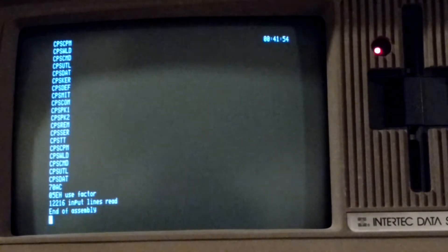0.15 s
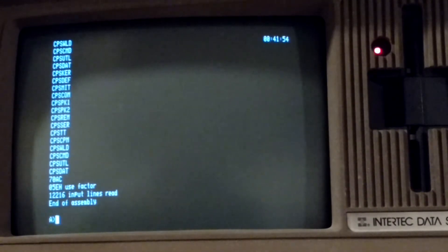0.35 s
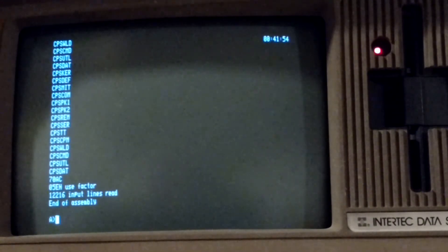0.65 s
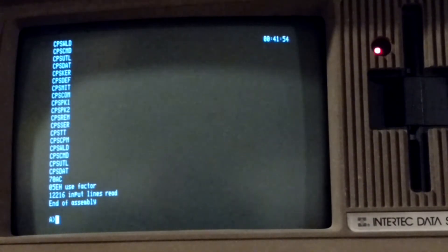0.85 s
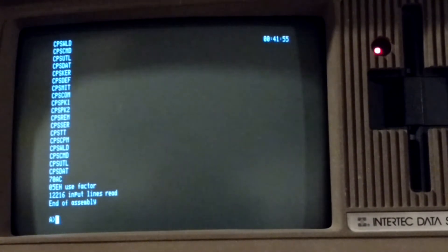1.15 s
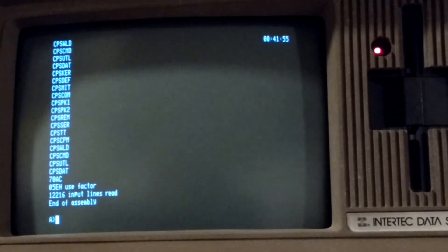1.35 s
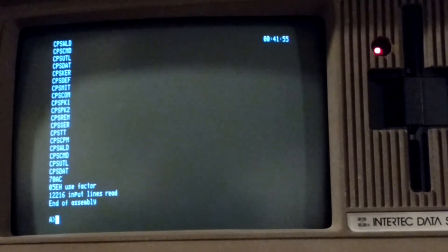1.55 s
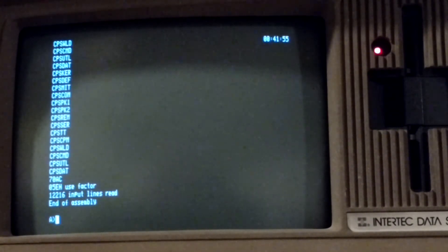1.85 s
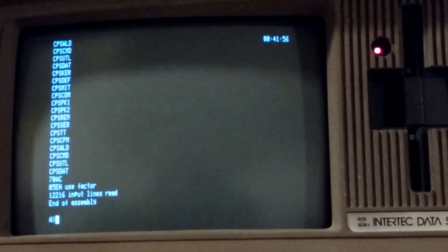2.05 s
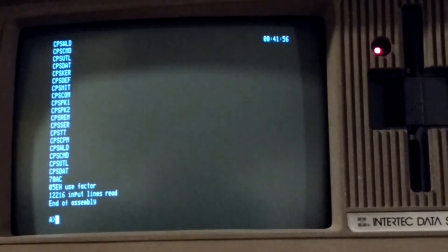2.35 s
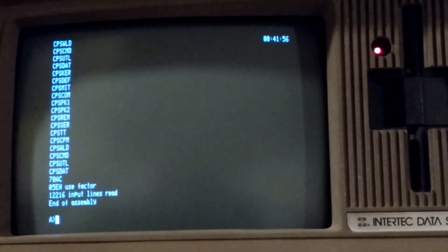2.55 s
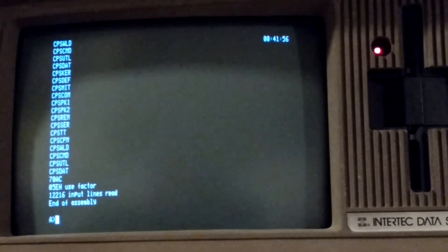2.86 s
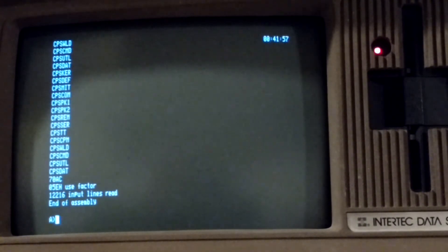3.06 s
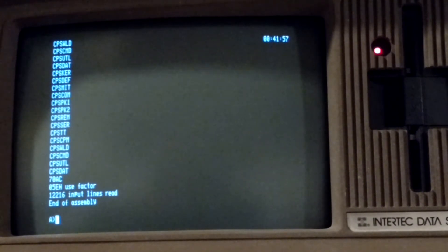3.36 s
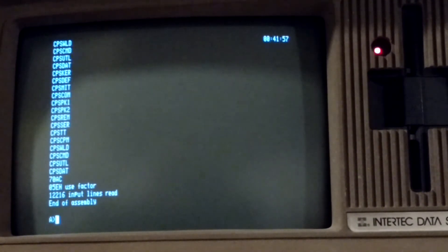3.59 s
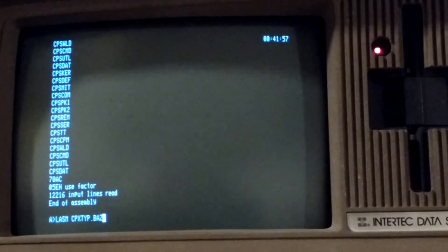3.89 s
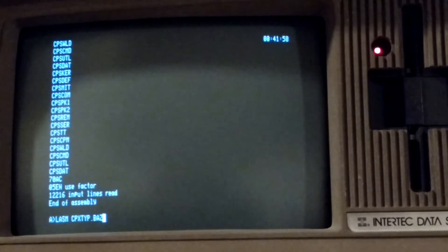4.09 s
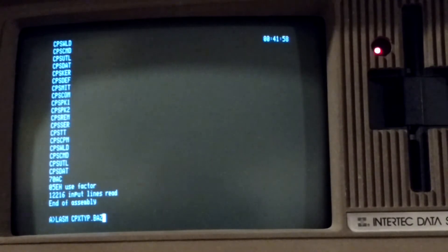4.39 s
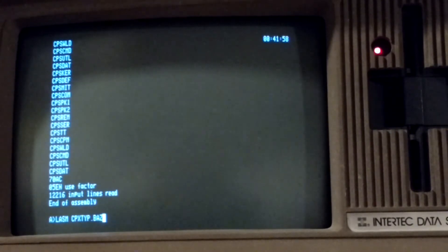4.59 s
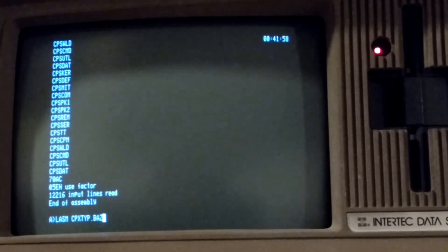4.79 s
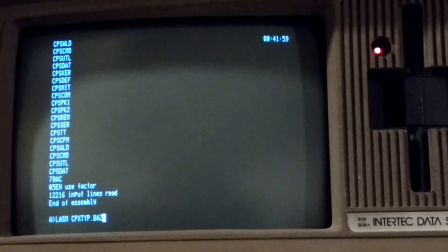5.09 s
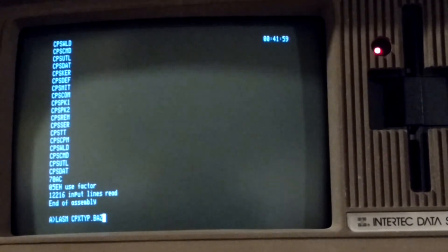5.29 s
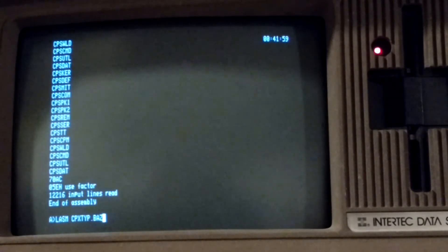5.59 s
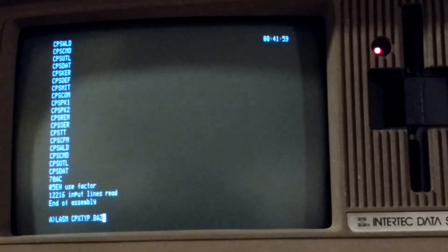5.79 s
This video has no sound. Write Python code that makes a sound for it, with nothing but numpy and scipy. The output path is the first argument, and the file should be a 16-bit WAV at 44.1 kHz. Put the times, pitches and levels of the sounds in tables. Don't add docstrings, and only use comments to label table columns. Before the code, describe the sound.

A small room, close stereo microphone. An old computer's fan hums low and steadily with soft airy hiss, and a thin whine near 15 kHz stays constant. At the start the disk rubs faintly in its sleeve, fading within about half a second. Dull thuds with bright ticks come in pairs at 0.2 and 0.45 s. At 0.88 s the head starts a long run of steps, about 33 per second, a rattling ratchet pulsing slightly every four steps and softening until 1.8 s. After a brief gap, a slightly softer return run goes from 2.0 to 2.9 s, ending in uneven, sharper clicks and a tiny metallic ping at 3.1 s. Fan alone follows. Short double clicks come at 3.73 and 4.0 s, four quick ones at 4.55 s, a firmer thud with a close double tick at 5.13 s, and a last dull click at 5.93 s.

```python
import sys
import numpy as np
from scipy import signal
from scipy.fft import rfft, irfft, next_fast_len
from scipy.io import wavfile
from scipy.ndimage import uniform_filter1d, map_coordinates

SR = 44100
rng = np.random.default_rng(int(sys.argv[2]) if len(sys.argv) > 2 else 0)


def dump(signal):
    limited = np.clip(np.atleast_2d(signal).T, -1, 1)
    pcm = np.round(limited * 32767).astype(np.int16)
    wavfile.write(sys.argv[1], SR, pcm)


def nominal_scale(level):
    x = np.asarray(level, float) / 20
    return 10 ** x


N = 261925

# frequency in Hz, t60 in seconds.
ROOM_DECAY = [(150, 0.56), (1000, 0.36), (4000, 0.27), (12000, 0.2)]

# pitch in Hz; below, its level in dB.
TUBE_HZ = [15434, 15253, 15072]
TUBE_DB = [0, -10, -21]

# pitch in Hz; below, its level over the cabinet noise in dB.
FAN_HZ = [179.7, 442.3, 473.9, 505.4, 638.5, 670.3, 694, 940, 1005]
FAN_DB = [0.5, -0.5, -3, -4, -10, -6, -9, -15.5, -14.5]
# frequency in Hz, width in Hz, level in dB.
CABINET = [(129, 21, -2), (186.7, 11.5, -3.5), (304, 16, -10.5), (485.6, 26, -1.5), (578, 21, -8.5),
           (671.5, 39.5, -5.5), (871, 23.6, -7), (982, 53, -12), (1392, 25, -15.5), (1572, 41, -19.5)]
# frequency in Hz, level in dB per Hz.
AIR_COLOUR = [(20, 19), (70, -3), (110, 15.5), (300, 9.5), (1000, -11.5), (1200, -2), (2000, -4.5),
              (3000, -4), (4000, -12), (5000, -14.5), (6500, -10.5), (8500, -10.5), (11500, -19),
              (14500, -25.5)]
# time in seconds, cabinet level in dB, air level in dB.
BACKGROUND = [
    (0.0, -45.5, -50),
    (5.94, -45.5, -51),
]
# time in seconds, level in dB.
RUB = [
    (0, -52.5),
    (.3, -61.5),
    (.55, -78),
    (.7, -94),
    (5.94, -69),
]
# frequency in Hz, width in Hz, level in dB.
SLEEVE = [(1767, 40, 11), (2560, 370, 3), (5100, 430, -4.5)]

# start in seconds, pitch in Hz, level in dB, t60 in seconds.
PING = (3.0985, 4300, -38, .02)

STEP_S = 1 / 33.35
# first in seconds, last in seconds, thud level in dB.
COIL_RUNS = [
    (0.174, .22, -42),
    (.455, .5, -42),
    (0.88, 1.83, -41),
    (2.015, 3.08, -41),
    (3.736, 3.77, -42.5),
    (4.006, 4.05, -42.5),
    (4.549, 4.65, -41.5),
    (5.13, 5.14, -38.5),
    (5.93, 5.94, -42),
]
# frequency in Hz, width in Hz, level in dB.
ROTOR = [(60, 54, -37), (101.4, 8.5, -5), (129.1, 9.1, 7), (171, 51, -7), (352.7, 12.3, -5), (502, 16, -19),
         (576, 16.5, -3)]

# time in seconds, tick peak in dB,
# frame rattle over the tick in dB, bright clack over the tick in dB.
NUDGES = [(0.1785, -34, 4, -9.5), (0.2076, -44.5, 8, -20), (0.4524, -41, 9, -22), (0.4871, -29, 0.5, -10),
          (0.8778, -35, 1.5, -11.5), (0.9082, -40.5, 4.5, -9), (0.9457, -35, 0, -25),
          (2.9171, -30, 1.2, -19.5), (2.9478, -37, 3.5, -21), (2.9798, -35, 0.5, -8.5),
          (3.0081, -42, 7, -15), (3.041, -39, 6.5, -26), (3.0682, -27.5, -1.5, -12), (3.7279, -37, 5, -7.5),
          (3.758, -40.5, 5, -24), (4.0032, -41.5, 9, -22), (4.0358, -28.5, 0, -10.5),
          (4.5493, -34, 2, -14.5), (4.5774, -42, 4.5, -6), (4.6128, -37.5, 2, -21), (4.6425, -31.5, 4, -23),
          (5.1293, -46, 11, -16), (5.1363, -33, -1, -25), (5.9294, -43, 14.5, -18)]
NUDGE_REBOUND_DB, SLACK_REBOUND_DB = -50, -35
# start in seconds, end in seconds.
SLACK = [
    (.87, .92),
    (4.54, 4.59),
]
# first step in seconds, last in seconds, tick peak in dB,
# frame level in dB, rebound over the step in dB.
TRAVELS = [
    (0.9744, 1.82, -33.5, -30, -12.5),
    (2.0182, 2.895, -37, -31, -6.5),
]
# steps a turn, step of the hardest blow, tick swing in dB,
# frame swing in dB, fade in dB per second.
TURNS = [
    (4.15, 0.56, 3, 3.2, -1.5),
    (4.02, 1.7, 1.96, 2.4, -2.2),
]
TRAVEL_CLACK_DB = [-27.5, -25]
LATE_S_PER_DB = .00015
# time in seconds, then tick, frame, clack and rebound in dB.
SCATTER = [.0003, .6, .6, 2, 1.5]

# frequency in Hz, width in Hz; below, the level of each in dB.
FRAME = [(75, 90), (160, 30), (235, 30), (330, 70), (467, 30), (501, 14), (560, 30), (660, 70), (742, 14),
         (800, 30), (858, 16), (938, 20), (1075, 90), (1285, 18), (1448, 28), (1580, 80), (1830, 60),
         (2150, 350)]
FRAME_DB = [-18, -12, -17.5, -19, -4, 1, -5.5, -11.5, -0.5, -6, 0.5, -3, -14.5, -7.5, -11.5, -11.5, -12,
            -19.5]
# frequency in Hz, width in Hz, level in dB.
SCREW = [(3080, 220, -1), (3650, 260, -4), (5550, 260, -8), (7920, 130, 0), (8270, 150, -6)]
# frequency in Hz, width in Hz, level in dB.
TICK = [(2840, 410, 8), (3790, 1700, -4), (5250, 330, 5.5), (6320, 270, 4.5), (7400, 490, -0.5),
        (9500, 620, -16)]
# frequency in Hz, width in Hz, level in dB.
CLACK = [(8850, 700, 12), (10350, 1140, 10.5), (12400, 2000, -43.5), (14500, 4500, 1)]

# frequency in Hz, level in dB.
APART = [(60, -18), (150, -11.5), (300, -13.5), (500, -5.5), (1000, -8.5), (2000, -1), (4000, -2.5),
         (8000, 0.5), (13000, 0.5), (15400, -3)]
# frequency in Hz, share from 0 to 1.
SHARED = [(100, 0.89), (300, 0.16), (600, 0.88), (1100, 0.24), (2000, 0.43), (3500, 0.82), (8000, 0.56),
          (12000, 0.27)]
# frequency in Hz, phase in radians.
LEAD = [(60, 0), (150, 0), (450, 0.99), (700, 0.56), (1200, 0), (3000, 0.45), (8000, 0.34)]
# frequency in Hz, gain as a factor.
CANCEL = [(1000, .98), (3700, .99), (4700, .96), (5100, .9), (6300, .5), (7600, .72), (8900, .8),
          (10000, .9), (11200, .78), (12600, .86), (13800, .6), (14900, .92)]
NOTCH_HZ = [0, 1259, 2508, 3690, 4974, 6300, 7600, 8930, 9990, 11180, 12600, 13800, 15000, 16250]
TOP_HZ = 15520


def unit(x):
    return x / np.sqrt(np.mean(x ** 2, axis=-1, keepdims=True) + 1e-20)


def along(points, hz):
    f, v = np.transpose(points)
    return np.interp(np.log(hz + 1), np.log(f + 1), v)


def filtered(x, response):
    m = next_fast_len(x.shape[-1] + SR // 2)
    spectrum = rfft(x, m) * response(np.fft.rfftfreq(m, 1 / SR))
    return irfft(spectrum, m)[..., :x.shape[-1]]


def resonant(x, modes):
    def shape(f):
        total = 0
        for k, (centre, width, db) in enumerate(modes):
            damping = 1j * f * width
            total = total + (-1) ** k * nominal_scale(db) * damping / (centre * centre - f * f + damping)
        return total

    power = np.mean(abs(shape(np.linspace(0, SR / 2, num=8192))) ** 2)
    return filtered(x, shape) / np.sqrt(power)


def wobble(rate):
    knots = rng.standard_normal(round(N / SR * 40) + 4)
    return map_coordinates(knots, [np.arange(N) * rate / SR])


def strikes(times, levels_db):
    at = np.clip(np.round(times * SR).astype(int), 0, N - 1)
    return np.bincount(at, nominal_scale(levels_db), N)


def bursts(times, levels_db, rise, t60):
    t = np.arange(SR // 5) / SR
    shape = (1 - np.exp(-t / rise)) * nominal_scale(-60 * t / t60)
    envelope = signal.fftconvolve(strikes(times, levels_db), shape / shape.max())[:N]
    return envelope * rng.standard_normal((2, N))


def room(x):
    hz, t, z = signal.stft(rng.standard_normal((2, SR // 3)), SR, nperseg=256)
    decay = nominal_scale(-60 * t / along(ROOM_DECAY, hz)[:, None])
    tail = signal.istft(z * decay, SR, nperseg=256)[1]
    late = np.pad(x, ((0, 0), (200, 0)))
    return signal.fftconvolve(late, tail / np.linalg.norm(tail[0]), axes=1)[:, :N]


def tube():
    t = np.arange(N) / SR
    whine = sum(nominal_scale(db - 70.0 + .7 * wobble(7.9)) * np.sin(2 * np.pi * hz * t)
                for hz, db in zip(TUBE_HZ, TUBE_DB))
    return np.array([.72 * whine, -whine])


def fan():
    s, hum_db, air_db = np.transpose(BACKGROUND)
    t = np.arange(N) / SR
    drift = np.cumsum(wobble(2.026)) / SR
    turned = t + 0.003996 * drift
    orders = 0
    for hz, db in zip(FAN_HZ, FAN_DB):
        level = nominal_scale(db + 2.34 * wobble(12))
        orders = orders + level * np.sin(2 * np.pi * (hz * turned + rng.random((2, 1))))
    cabinet = resonant(rng.standard_normal((2, N)), CABINET)
    hum = (orders + cabinet) * nominal_scale(np.interp(t, s, hum_db) - 4 + 1.3 * wobble(2.45))

    z = signal.stft(rng.standard_normal((2, N)), nperseg=256)[2]
    field = uniform_filter1d(rng.standard_normal(z.shape[1:]), size=12, axis=0)
    field = uniform_filter1d(field, size=4, axis=1)
    patchy = signal.istft(z * nominal_scale(0.98 * field / field.std()), nperseg=256)[1][:, :N]
    air = unit(filtered(patchy, lambda hz: nominal_scale(along(AIR_COLOUR, hz))))
    air = air * nominal_scale(np.interp(t, s, air_db) + .7 * wobble(5) + 1.1 * wobble(30))

    rub = resonant(rng.standard_normal((2, N)), SLEEVE) * nominal_scale(np.interp(t, *np.transpose(RUB)))
    return hum + rub + air


def spring():
    s, hz, db, t60 = PING
    t = np.clip(np.arange(N) / SR - s, 0, None)
    return nominal_scale(db - 60 * t / t60) * (1 - np.exp(-t / .001)) * np.sin(2 * np.pi * hz * t)


def stepper():
    pulses = 0
    for first, last, db in COIL_RUNS:
        times = np.arange(first, last, STEP_S)
        pulses = pulses + strikes(times, 0 * times + db + 32)
    thud = resonant(pulses, ROTOR)
    return np.array([thud, 0.13 * thud])


def steps():
    s, tick_db, rattle_db, clack_db = np.transpose(NUDGES)
    slack = sum((s > first) & (s < last) for first, last in SLACK)
    rebound_db = np.where(slack, SLACK_REBOUND_DB, NUDGE_REBOUND_DB) - tick_db
    rows = [np.transpose([s, tick_db, rattle_db, clack_db, rebound_db])]
    for travel, turn, clack in zip(TRAVELS, TURNS, TRAVEL_CLACK_DB):
        first, last, tick, frame, rebound = travel
        period, hardest, tick_swing, frame_swing, fade = turn
        gone = np.arange(0, last - first, STEP_S)
        load = np.cos(2 * np.pi * (gone / STEP_S - hardest) / period)
        scatter = rng.standard_normal((len(gone), len(SCATTER))) * SCATTER
        off, ticks, frames, clacks, rebounds = scatter.T
        times = first + gone + off - LATE_S_PER_DB * tick_swing * load
        ticks = ticks + tick + tick_swing * load + fade * gone
        frames = frames + frame + frame_swing * load + fade * gone
        rows.append(np.transpose([times, ticks, frames - ticks, clack + clacks, rebound + rebounds]))
    return np.concatenate(rows).T


def head():
    s, tick_db, rattle_db, clack_db, rebound_db = steps()
    both = np.concatenate([s, s + 0.0094])
    again = np.concatenate([0 * s, rebound_db])
    frame_db = np.tile(tick_db + rattle_db, 2) + again
    screw_db = np.tile(tick_db, 2) + again

    blow = strikes(both - .002, frame_db + 14.5)
    rattle = bursts(both - .007, frame_db - 7.5, rise=0.006, t60=0.081) + [blow, np.roll(blow, 37)]
    tap = strikes(both + .001, screw_db + 1)
    snap = bursts(both, screw_db - 12, rise=.0015, t60=.018) + [tap, np.roll(tap, 11)]
    scrape = bursts(both - .0007, screw_db - 14, rise=0.0016, t60=0.059)
    clack = bursts(s - .0005, tick_db + clack_db, rise=0.004, t60=0.025)

    frame = [(*mode, db) for mode, db in zip(FRAME, FRAME_DB)]
    on_frame = resonant(rattle, frame)
    on_screw = resonant(snap, SCREW) + resonant(scrape, TICK)
    return on_frame + on_screw + resonant(clack, CLACK)


def ports(pair):
    def split(hz):
        share = np.clip(along(SHARED, hz), 0, 1)
        follows = -share * np.exp(1j * along(LEAD, hz))
        return nominal_scale(along(APART, hz)) * [follows, np.sqrt(1 - share ** 2)]

    return np.array([pair[0], filtered(pair, split).sum(axis=0)])


def scene():
    drive = stepper() + head()
    heard = drive + nominal_scale(-10.0) * room(drive) + spring() + fan()
    both, apart = ports(heard) + tube()
    return np.array([both + apart, both - apart])


def low_pass(x):
    return signal.sosfilt(signal.butter(12, 15890, fs=SR, output="sos"), x)


def record(dry):
    def delay(hz):
        turn = np.pi * np.interp(hz, NOTCH_HZ, np.arange(len(NOTCH_HZ)))
        return along(CANCEL, hz) * np.exp(-1j * turn)

    late = filtered(dry[::-1], delay)
    cut = filtered(dry - late, lambda hz: nominal_scale(-.05 * np.clip(hz - TOP_HZ, 0, 2000)))
    return low_pass(cut)


dry = scene()
out = record(dry)
dump(out)
```